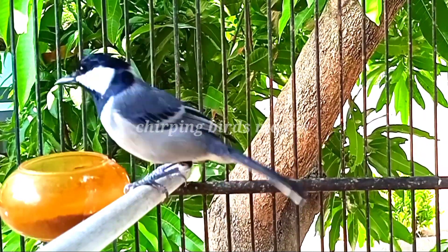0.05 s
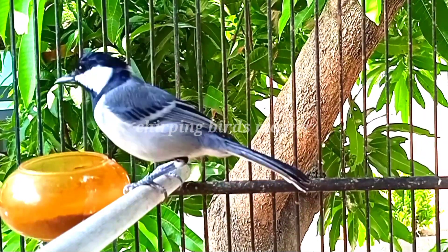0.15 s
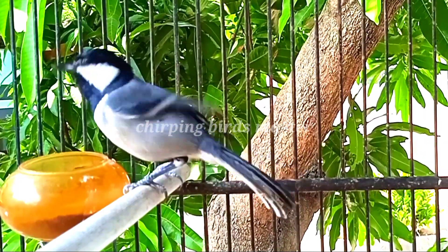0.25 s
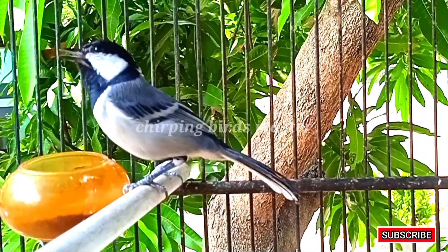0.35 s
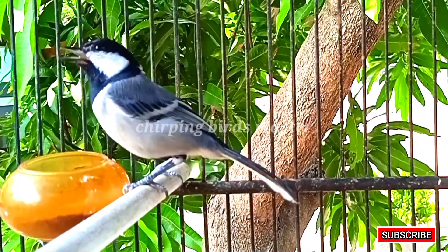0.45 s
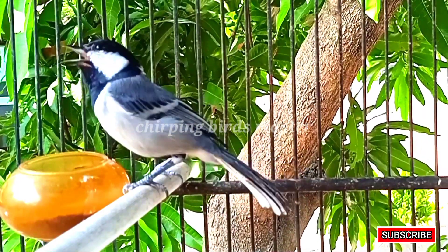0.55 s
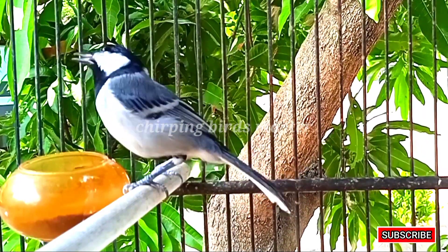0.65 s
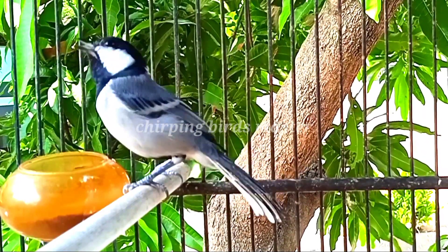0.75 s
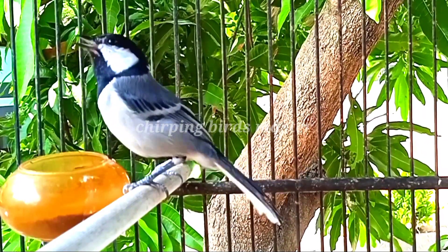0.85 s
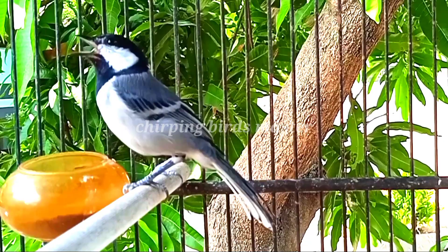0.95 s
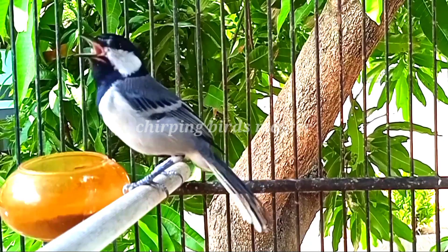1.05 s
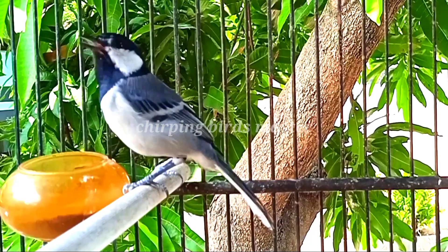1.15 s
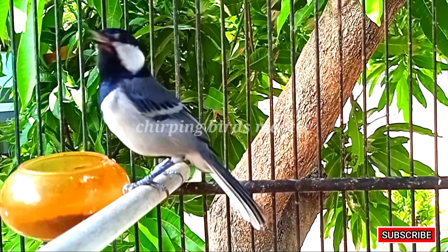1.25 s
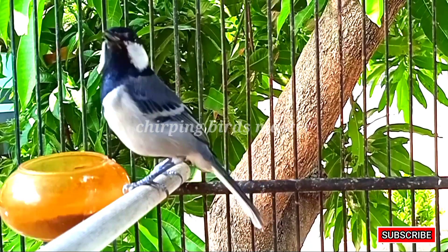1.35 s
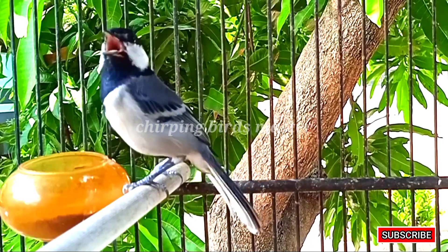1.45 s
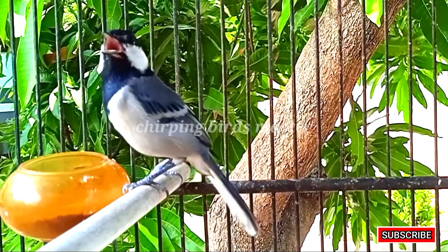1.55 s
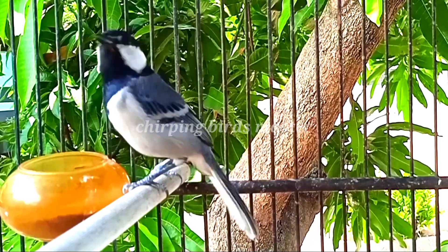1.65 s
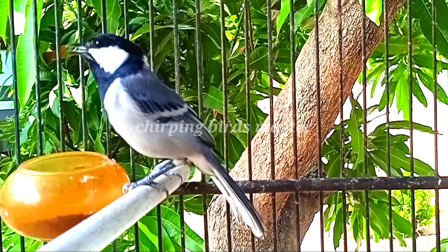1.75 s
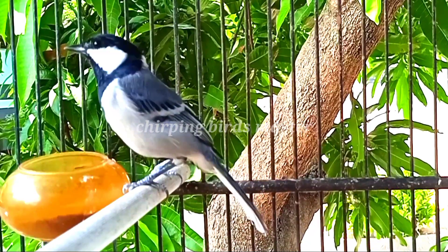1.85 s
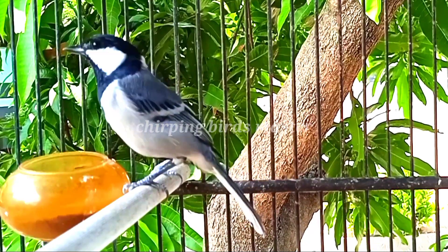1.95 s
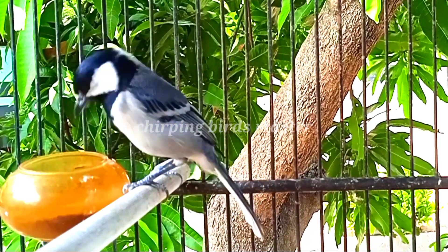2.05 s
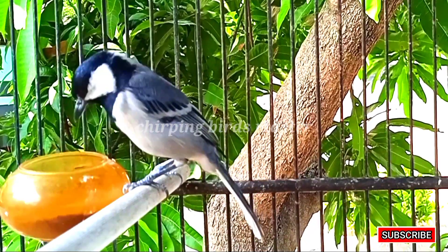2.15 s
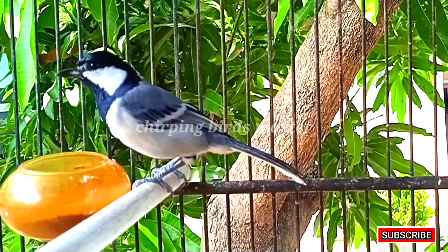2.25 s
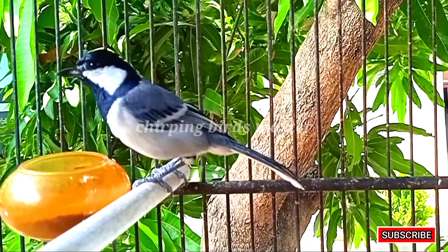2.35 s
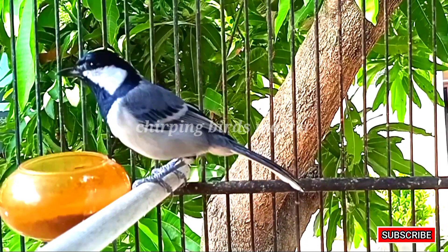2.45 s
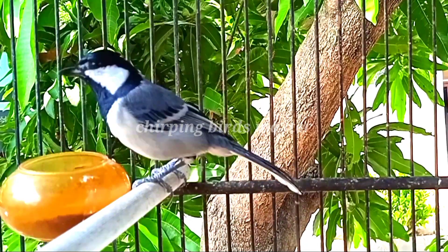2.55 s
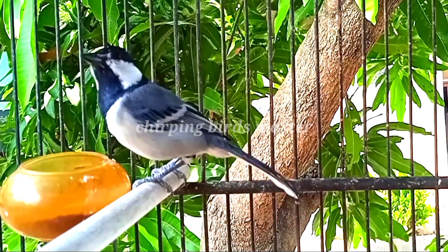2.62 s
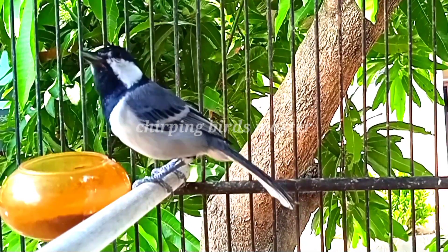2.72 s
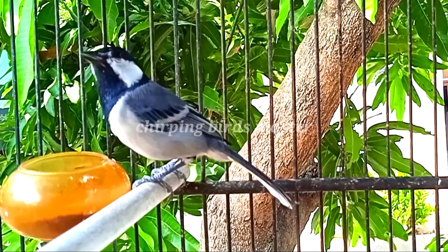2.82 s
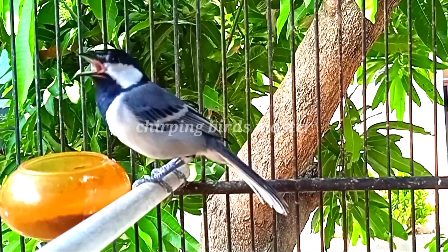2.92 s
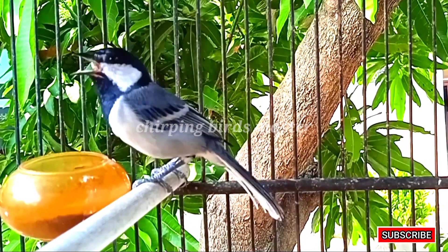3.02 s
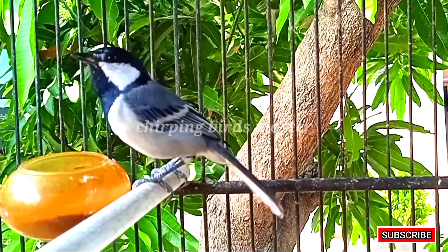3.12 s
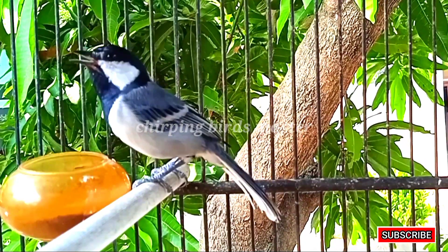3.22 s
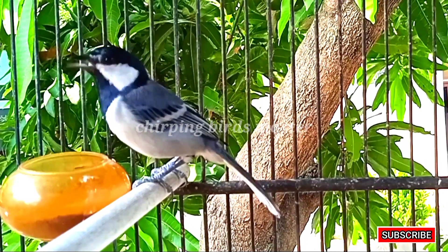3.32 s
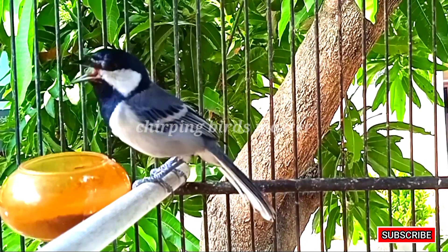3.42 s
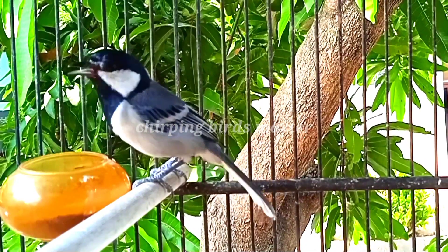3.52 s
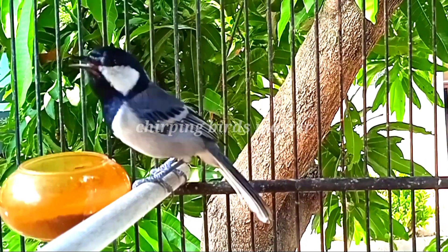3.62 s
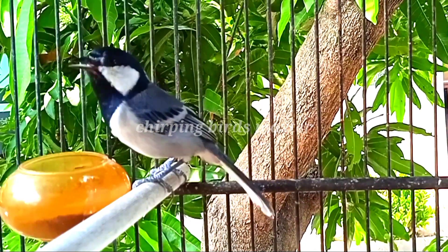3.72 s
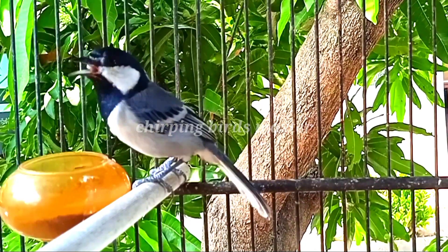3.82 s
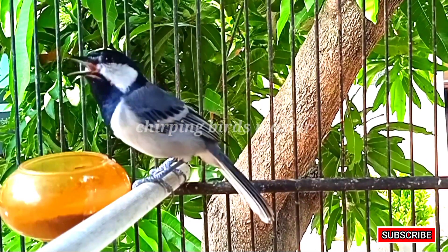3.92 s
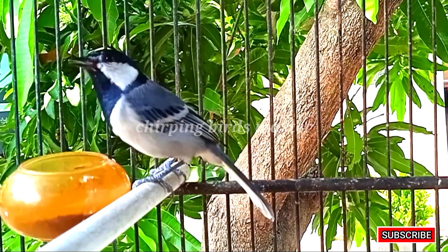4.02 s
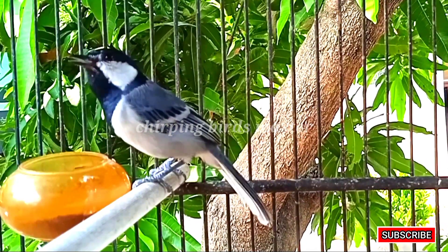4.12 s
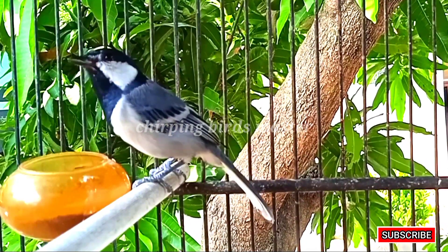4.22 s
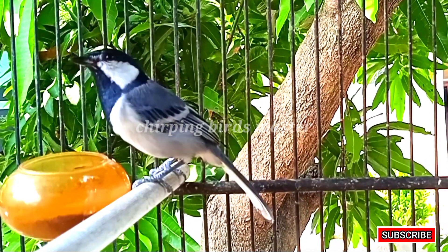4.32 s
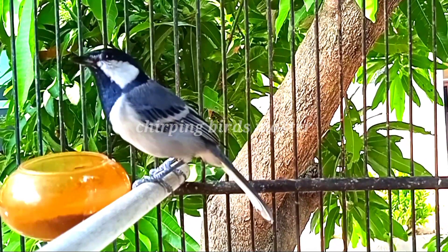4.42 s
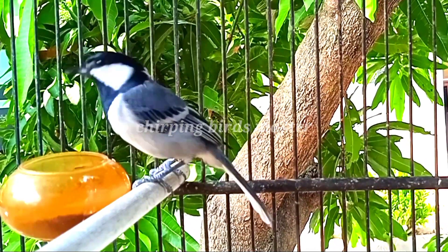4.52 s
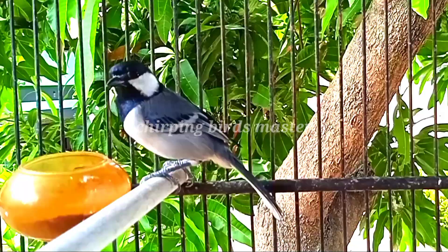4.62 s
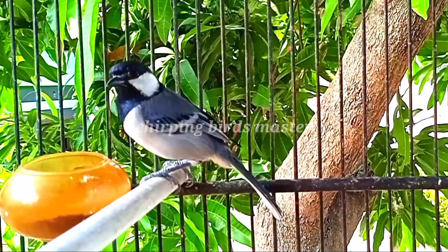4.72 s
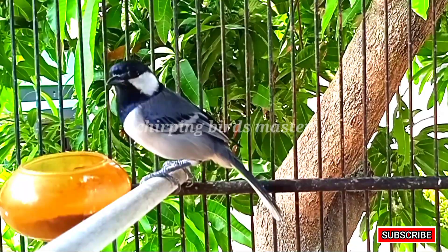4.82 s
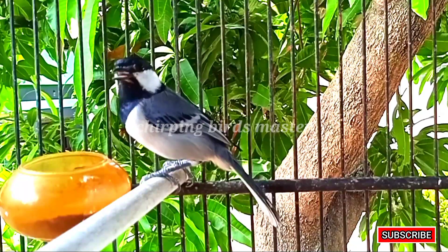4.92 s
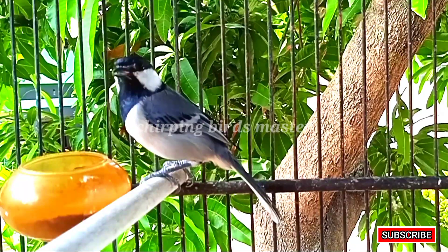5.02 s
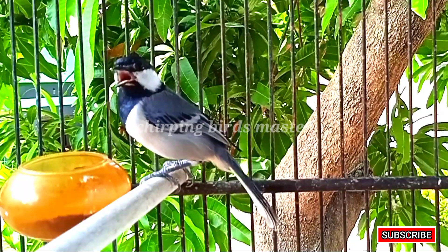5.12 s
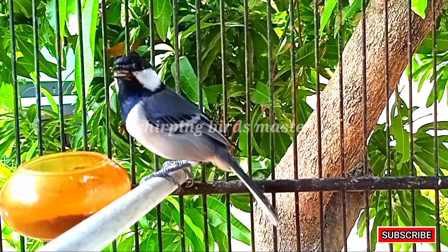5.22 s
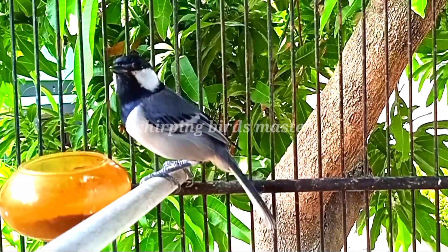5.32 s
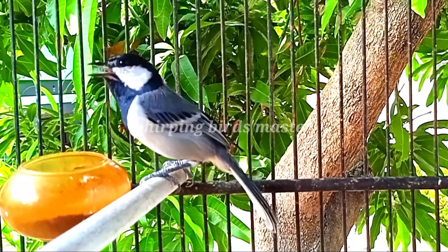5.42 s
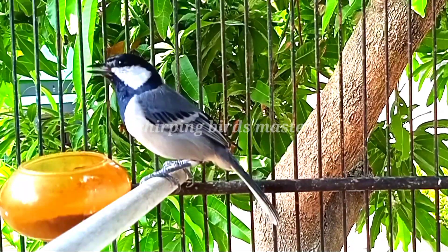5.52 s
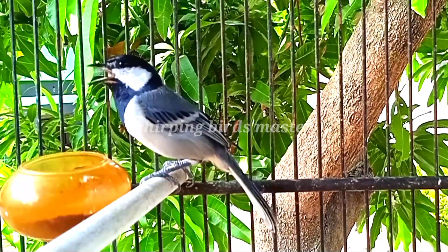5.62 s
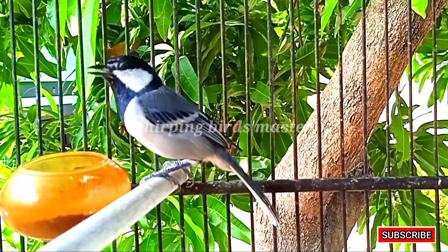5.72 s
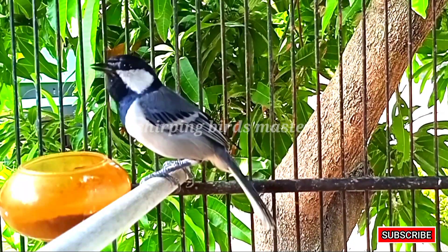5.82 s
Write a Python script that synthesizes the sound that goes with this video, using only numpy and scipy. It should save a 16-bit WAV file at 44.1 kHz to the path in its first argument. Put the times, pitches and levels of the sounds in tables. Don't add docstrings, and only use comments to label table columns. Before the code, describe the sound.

Outdoors in a leafy walled yard, a near, clear and fairly dry bird voice repeats piercing two-part whistles, three rounds, a pause, then three more. Distant birds answer with lower, blurred, warbling whistles in the gaps. A sharp little wire rattle comes before the singer switches to alternating wavy and up-hooking notes. Low, quiet town rumble continues throughout, with barely heard soft breathy thumps under the loudest notes.

```python
import sys
import numpy as np
from scipy import signal
from scipy.io import wavfile
from scipy.ndimage import uniform_filter1d

SR = 44100
rng = np.random.default_rng(int(sys.argv[2]) if len(sys.argv) > 2 else 0)


def master_out(mix):
    frames = np.transpose(np.atleast_2d(mix))
    ceiling = np.clip(frames, -1, 1)
    pcm = np.round(ceiling * 32767).astype(np.int16)
    wavfile.write(sys.argv[1], SR, pcm)


def undo_db(level):
    steps = np.asarray(level, float) / 20
    return 10 ** steps


N = 258867


def at_hz(points, hz):
    f, db = np.transpose(points)
    return np.interp(np.log(hz), np.log(f), db)


def drift(rate):
    knots = rng.standard_normal(int(N / SR * rate) + 3)
    joined = np.interp(np.arange(N) / SR * rate, np.arange(len(knots)), knots)
    return uniform_filter1d(joined, int(SR / rate / 2) + 1)


# f/Hz, density/dB per Hz
TOWN_SPECTRUM = [(15, -57), (25, -36.5), (80, -6.5), (284, -13.5), (500, -9.5), (542, -11), (981, -16),
                 (1150, -17), (1870, -19), (3390, -25.5), (5980, -33.5), (10800, -47.5), (15800, -41)]
# t/s, murmur level/dB
TOWN_BUSTLE = [(0.0, -66.5), (0.24, -67), (0.46, -62), (1.21, -64.5), (1.65, -63), (2.09, -65),
               (2.34, -64.5), (3.78, -67), (4.54, -64), (4.89, -61), (5.87, -62.5)]
# nearest t/s, passing time/s, hum swell/dB
ENGINE_PASSES = [(.3, .15, 5), (1.002, 0.38, 2.5), (1.7, 0.31, 6), (2.42, .15, 5.5), (3.85, .12, 3.5),
                 (5.1, 0.37, 6), (5.7, 0.29, 6.5)]


def town():
    t = np.arange(N) / SR
    s, murmur_db = np.transpose(TOWN_BUSTLE)
    hum_db = -70.5 + 0.32 * (murmur_db - murmur_db.mean())
    passing_db = sum(db * np.exp(-((t - near) / length) ** 2) for near, length, db in ENGINE_PASSES)
    white = rng.standard_normal((2, N))
    together = drift(1.9)
    edges = 25 * 2 ** np.arange(0, 9.4, 1 / 3)
    hum, murmur = np.zeros((2, N))
    for k, (low, high) in enumerate(zip(edges, edges[1:])):
        third_octave = signal.butter(2, [low, high], "band", fs=SR, output="sos")
        band = signal.sosfilt(third_octave, white[k % 2])
        band *= undo_db(at_hz(TOWN_SPECTRUM, np.sqrt(low * high)) + 0.42 * together + 4.1 * drift(5.3))
        if high < 210:
            hum += band
        else:
            murmur += band
    hum *= undo_db(np.interp(t, s, hum_db) + passing_db) / hum.std()
    murmur *= undo_db(np.interp(t, s, murmur_db)) / murmur.std()
    return hum + murmur


# f/Hz, gain/dB
OVERTONE_COLOUR = [(4500, -7.5), (6500, 8), (8500, -0.5), (10000, -4.5), (12500, -13), (15000, 4),
                   (15900, -8.5)]


def add_whistle(out, start_s, hz, level_db, overtones_db):
    phase = 2 * np.pi * np.cumsum(hz) / SR
    tone = np.sin(phase)
    for k, db in enumerate(overtones_db, start=2):
        audible = k * hz < 15900
        tone += undo_db(db + at_hz(OVERTONE_COLOUR, k * hz)) * audible * np.sin(k * phase)
    index = np.arange(len(hz))
    edge = np.clip(np.minimum(index, index[::-1]) / (.004 * SR), 0, 1)
    at = round(start_s * SR)
    out[at:at + len(hz)] += (np.sqrt(2) * undo_db(level_db) * edge * tone)[:N - at]


def neighbours(rows, attack_s, release_s, waver_db, warble_hz, overtones_db):
    out = np.zeros(N)
    waver = waver_db * drift(32)
    settle, edge_db = 2.6, 28
    for s, length, first, last, db in rows:
        t = np.arange(0, length, 1 / SR)
        settled = (1 - np.exp(-settle * t / length)) / (1 - np.exp(-settle))
        warble = warble_hz * np.clip(t / 0.11, 0, 1) * np.sin(2 * np.pi * 43.64 * (s + t))
        attack = t / min(attack_s, length / 3)
        release = (length - t) / min(release_s, length / 3)
        swell = np.clip(np.minimum(attack, release), 0, 1)
        level_db = db - edge_db * (1 - swell) + np.interp((s + t) * SR, np.arange(N), waver)
        add_whistle(out, s, first + (last - first) * settled + warble, level_db, overtones_db)
    return out


# t/s, length/s, first f/Hz, last f/Hz, level/dB
COOS = [
    (0, .11, 970, 1015, -72),
    (.54, 0.057, 783, 770, -56.5),
    (.59, .21, 949, 955, -62.5),
    (1.43, 0.13, 1006, 1010, -58),
    (2.78, 1, 717, 750, -77.5),
]
# t/s, length/s, first f/Hz, last f/Hz, level/dB
HELD = [(1.93, 0.14, 3430, 3395, -42.5), (2.04, 0.098, 3366, 3383, -39.5), (2.705, .23, 3315, 3350, -44),
        (2.96, .1, 3244, 3345, -53), (3.925, .21, 2811, 2855, -27), (4.1, 0.13, 2837, 2822, -37),
        (4.145, 0.21, 2430, 2496, -40), (5.005, 0.17, 2613, 2678, -35), (5.12, .125, 2628, 2633, -35.5),
        (5.22, 0.2, 2565, 2680, -58), (5.27, 0.28, 3758, 3670, -33), (5.62, 0.0547, 3680, 3705, -42)]
HELD_OVERTONES = [-39.5, -52.5, -40, -39]


def held_whistles():
    return neighbours(HELD + COOS, attack_s=0.059, release_s=.05, waver_db=5, warble_hz=0,
                      overtones_db=HELD_OVERTONES)


# t/s, length/s, first f/Hz, last f/Hz, level/dB
GLIDES = [
    (2.24, 0.2, 3140, 2580, -47),
    (3.08, 0.25, 3097, 2570, -44),
    (3.425, .08, 2274, 2705, -41.5),
    (3.46, .15, 2550, 3250, -43.5),
    (3.645, .12, 3183, 3535, -40),
    (3.92, .07, 6690, 7170, -56),
    (4.3, .29, 2820, 2630, -39),
]
# t/s, length/s, first f/Hz, last f/Hz, level/dB
SLURS = [
    (2.375, 0.04, 4670, 4070, -61.5),
    (2.52, 0.041, 3900, 3665, -73),
    (3.605, .11, 4130, 3760, -42),
    (3.72, 0.17, 5140, 4365, -41),
    (4.745, .28, 3230, 2997, -39),
    (5.57, 0.33, 2476, 4794, -37.5),
]
GLIDE_OVERTONES = [-37.5, -39, -37, -33.5]


def gliding_whistles():
    shape = dict(attack_s=0.039, release_s=.07, waver_db=4, overtones_db=GLIDE_OVERTONES)
    return neighbours(GLIDES, warble_hz=162, **shape) + neighbours(SLURS, warble_hz=60, **shape)


def yard(x, near_db, near_t60, far_db, far_t60, onset_s):
    t = np.arange(SR) / SR
    near, far = rng.standard_normal((2, SR))
    far = signal.lfilter([.5], [1, -.5], far)
    tail = undo_db(near_db - 60 * t / near_t60) * near / np.sqrt(near_t60)
    tail += undo_db(far_db - 60 * t / far_t60) * far / np.sqrt(far_t60)
    tail *= np.sqrt(6 * np.log(10) / SR) * np.clip(t / onset_s, 0, 1)
    return signal.fftconvolve(x, tail)[:N]


# t/s, length/s, touches/s, level/dB
RATTLES = [
    (0.18, .06, 1800, -59.5),
    (2.458, 0.064, 2400, -48),
    (2.04, .01, 900, -48.5),
    (4.572, .012, 1500, -51),
    (4.669, 0.028, 1800, -35),
]
# f/Hz, level/dB, t60/s
WIRE_MODES = [(908, -5.5, 0.027), (1662, -7.5, 0.022), (2680, -7.5, .03), (4660, -11.5, .03),
              (6320, -1, 0.041), (5630, -4, .07), (6640, -7.5, 0.085), (7660, -3.5, .04),
              (7900, -8.5, 0.042), (9270, -17.5, .08), (9730, -30, 0.054), (11450, -14, 0.09)]


def cage():
    t = np.arange(N) / SR
    touches = np.zeros(N)
    chance = rng.random(N)
    sizes = undo_db(5.2 * rng.standard_normal(N)) * rng.choice([-1, 1], N)
    for s, length, per_s, db in RATTLES:
        fading = undo_db(db - 8 * (t - s).clip(0, 1) / length)
        touches += fading * sizes * (chance < per_s / SR) * (t > s) * (t < s + length)
        touches[round(s * SR)] += undo_db(db)
    dull = signal.butter(3, 8500, fs=SR, output="sos")
    out = undo_db(0.5) * signal.sosfilt(dull, touches)
    for hz, db, t60 in WIRE_MODES:
        r, w = undo_db(-60 / (t60 * SR)), 2 * np.pi * hz / SR
        struck = touches * rng.standard_normal(N) + 1e-18
        out += signal.lfilter([0, undo_db(db - 22.5) * np.sin(w)], [1, -2 * r * np.cos(w), r * r], struck)
    return out


# place (0 start, 1 top of the sweep, 2 end), f/Hz
RISE_PITCH = [(-.09, 2289), (0, 2717), (.12, 3060), (.23, 3304), (.639, 3483), (.893, 3822), (.959, 3956),
              (1, 4693), (1.501, 4856)]
DIP_PITCH = [(.08, 6010), (.559, 6460), (1, 7652), (1.156, 6220), (1.3, 5304), (1.43, 4930), (1.62, 4860),
             (1.86, 5159), (1.97, 5980)]
WAVE_PITCH = [(-.1, 3190), (0.7, 3780), (0.845, 4470), (1, 5790), (1.11, 4650), (1.293, 4038), (1.72, 4490),
              (1.892, 5254), (2.002, 5250)]
HOOK_PITCH = [(0, 4830), (.2, 5200), (.78, 5640), (.874, 6080), (.971, 8180), (1.001, 8430), (1.194, 8370),
              (1.668, 6880), (2, 6490)]
# place (as above), level/dB
RISE_LEVEL = [(-.1, -20), (0.201, 3), (.35, 0), (.56, -0.5), (.82, 0.5), (.93, 1), (.98, 8.5), (1.199, 0),
              (2, -14)]
DIP_LEVEL = [(.08, -22), (.35, -15), (.65, 3.5), (.95, 1.5), (1.1, 1.5), (1.35, -2.5), (1.75, 2),
             (1.93, -2), (2, -3)]
WAVE_LEVEL = [(-.1, -23), (0.449, -8), (.65, -1.5), (.85, 2.5), (1.1, 4.5), (1.35, -7.5), (1.75, 6.5),
              (1.88, 5.5), (2, -21)]
HOOK_LEVEL = [(0, -34), (.15, -4), (.35, 2.5), (.7, 0), (.9, 3), (1.05, -11.5), (1.4, 3.5), (1.75, 4),
              (2, -15.5)]
# top t/s, length/s, low pitch factor, top pitch factor, level/dB
RISES = [(0.551, 0.12, 1.01, 1.006, -28.5), (1.01, 0.13, 0.98, 1.031, -24),
         (1.472, 0.13, 0.99, 1.045, -22.5), (1.953, 0.13, 1.011, 0.95, -26.5),
         (2.948, .126, 0.98, 1.065, -28), (3.414, 0.12, 0.993, 1.013, -24),
         (3.884, .132, 1.008, 0.97, -23.5), (4.382, 0.14, 1, 0.998, -27)]
DIPS = [(0.681, 0.16, 1.006, 1.001, -13), (1.135, .164, 1.017, 0.99, -12),
        (1.605, 0.16, 1.011, 1.008, -13.5), (3.078, 0.16, 1, 1.01, -13), (3.539, 0.17, 1.015, 1, -13),
        (4.022, 0.17, 0.988, 0.974, -13)]
WAVES = [
    (5.05, 0.1425, 1.03, 1.026, -20),
    (5.553, 0.15, .97, 1.02, -19),
]
HOOKS = [
    (5.325, 0.14, 0.99, 0.99, -16),
    (5.826, 0.15, 0.98, 1.029, -16.5),
]
SONG_OVERTONES = [-30.5, -30.5, -46, -51]
# f/Hz, width/Hz, loss/dB
NOTCHES = [(5848, 119, 17), (6356, 74, 11), (7430, 290, 6.5), (3430, 45, 7), (3900, 80, 9)]
# t/s, treble gain/dB per kHz, share of the cancelling (0-1.5), overtone gain/dB
FACING = [(.5, 0.5, 0.9, 0), (.9, -1.9, 1.3, 1.7), (1.2, -0.3, 1.17, 1.5), (1.5, -0.7, 0.2, 1.1),
          (1.9, -2, 0.76, 1.5), (2.9, 4.5, .8, 0.8), (3.1, -1.2, 0.75, -1.5), (3.5, 0.1, 0.5, 2),
          (3.85, -1.8, 0.4, -2.1), (4.05, 0, .9, -2.5), (4.35, -3.3, 1, -0.5), (5.05, -2.1, 1.4, -2.5),
          (5.3, 0.1, 0.9, -0.5), (5.548, -1.1, 0.19, 3), (5.8, -2, 1, 0.5)]


def singer():
    out, around = np.zeros((2, N))
    dropouts = drift(150).clip(0, 3) ** 2 - .3
    facing = np.transpose(FACING)
    tops = np.vstack(RISES + DIPS + WAVES + HOOKS)[:, 0]
    motifs = [(RISES, 0.95, RISE_PITCH, RISE_LEVEL), (DIPS, .22, DIP_PITCH, DIP_LEVEL),
              (WAVES, 0.48, WAVE_PITCH, WAVE_LEVEL), (HOOKS, 0.74, HOOK_PITCH, HOOK_LEVEL)]
    for notes, lead, pitch, level in motifs:
        pitch, level = np.transpose(pitch), np.transpose(level)
        for top, length, low, high, note_db in notes:
            before, after = lead * length, (1 - lead) * length
            rested = not np.any((tops < top) & (tops > top - .35))
            t = np.arange(top - before * (1 - pitch[0, 0] - .065 * rested), top + after + 0.002, 1 / SR)
            place = 1 + (t - top) / np.where(t < top, before, after)
            hz = uniform_filter1d(np.interp(place, *pitch), size=100, mode="nearest")
            height = ((hz - hz.min()) / np.ptp(hz)) ** 2
            speed = np.tanh(np.abs(np.gradient(hz)) * SR / hz / 6.0)
            speed = uniform_filter1d(speed, size=400, mode="nearest")

            size = round(.003 * SR)
            tick_phase = 2 * np.pi * hz[0] * np.geomspace(1, 1.3, size).cumsum() / SR
            tick = undo_db(note_db - 30.5) * np.hanning(size) * np.cos(tick_phase)
            out[round(t[0] * SR):][:size] += tick

            hz = hz * (low + (high - low) * height)
            treble_db, cancel, bright_db = (np.interp(top, facing[0], c) for c in facing[1:])
            overtones_db = np.add(SONG_OVERTONES, bright_db)
            db = note_db - (0.1 + 6.4 * speed) * np.interp(t * SR, np.arange(N), dropouts)
            db += treble_db * (hz - hz.mean()) / 1000
            db += np.interp(place, *level)
            add_whistle(around, t[0], hz, db, overtones_db)
            loss = sum(loss_db * np.exp(-((hz - f) / width) ** 2) for f, width, loss_db in NOTCHES)
            add_whistle(out, t[0], hz, db - cancel * loss, overtones_db)
    return out, around


# delay t/s, level/dB
ECHOES = [(.0013, -19), (.0034, -20), (.0071, -15), (.012, -17)]


def reflections(bird):
    started = np.arange(N) > SR / 10
    return sum(undo_db(db) * np.roll(bird, round(s * SR)) * started for s, db in ECHOES)


# t/s, level/dB, centre f/Hz
THUMPS = [(.69, -73, 500), (1.14, -55.5, 100.3), (1.146, -62.5, 720), (1.605, -53, 169.1), (2.5, -60.5, 130),
          (3.081, -54.5, 205), (3.545, -56.5, 245.4), (4.025, -66, 387)]


def thumps():
    out = np.zeros(N)
    shape = np.hanning(round(0.073 * SR))
    for s, db, hz in THUMPS:
        two_octaves = signal.butter(2, [hz / 2, hz * 2], "band", fs=SR, output="sos")
        band = signal.sosfilt(two_octaves, rng.standard_normal(4000))[-len(shape):]
        at = round(s * SR) - len(shape) // 2
        out[at:at + len(shape)] += undo_db(db) * shape * band / band.std()
    return out


def scene():
    background = town()
    held, glides = held_whistles(), gliding_whistles()
    wires = cage()
    bird, around = singer()
    direct = bird + reflections(bird)
    bird_tail = yard(around, near_db=-13.5, near_t60=0.19, far_db=-20.5, far_t60=0.52, onset_s=.012)
    far = undo_db(-1) * held + undo_db(-1.5) * glides + wires
    far += yard(undo_db(-12) * held + glides + wires,
                near_db=2.5, near_t60=0.45, far_db=-14, far_t60=0.86, onset_s=0.0048)
    return (direct + bird_tail + far + thumps() + background)[None]


def low_pass(x):
    return signal.sosfilt(signal.butter(12, 16800, fs=SR, output="sos"), x)


def record(dry):
    dry = signal.sosfilt(signal.butter(2, 42, "high", fs=SR, output="sos"), dry)
    dry = signal.sosfilt(signal.cheby2(8, 40, 16500, fs=SR, output="sos"), dry)
    return low_pass(dry)


dry = scene()
out = record(dry)
master_out(out)
```